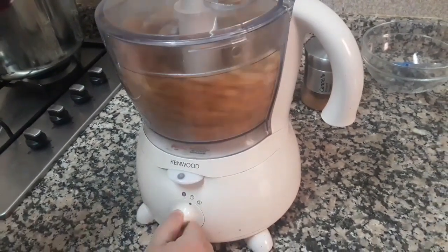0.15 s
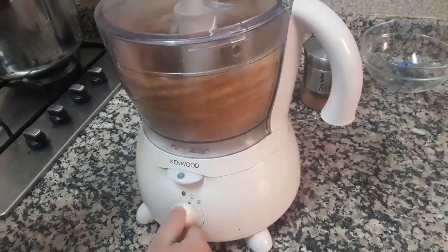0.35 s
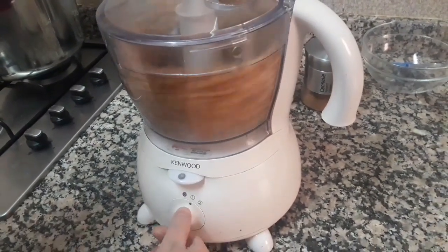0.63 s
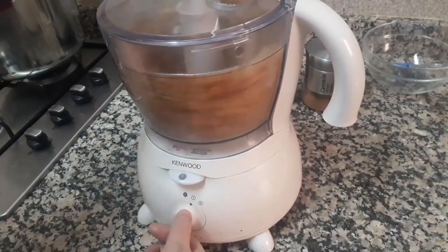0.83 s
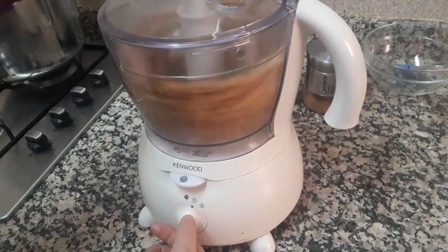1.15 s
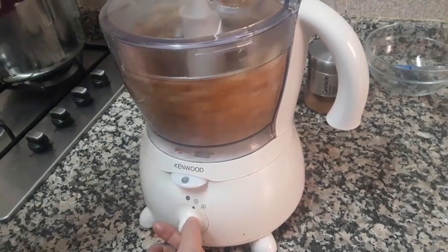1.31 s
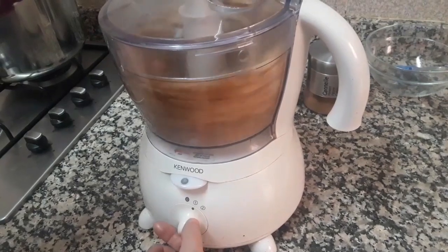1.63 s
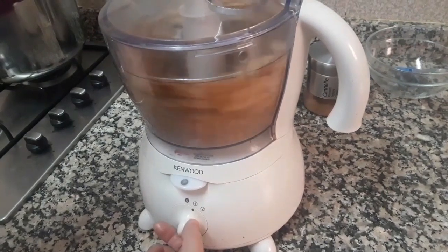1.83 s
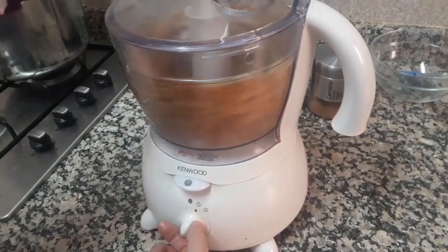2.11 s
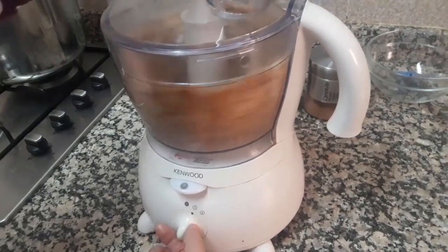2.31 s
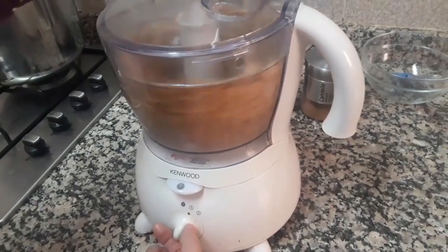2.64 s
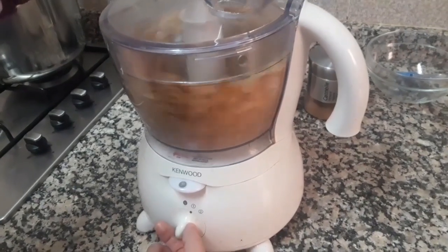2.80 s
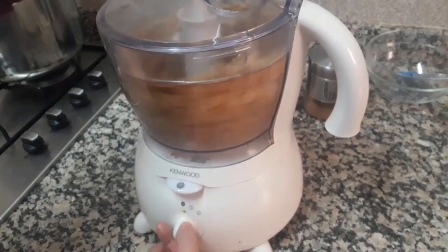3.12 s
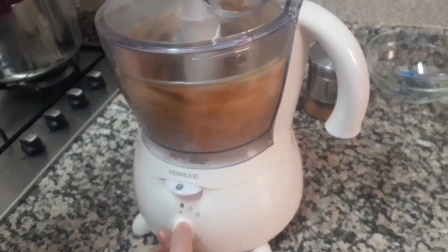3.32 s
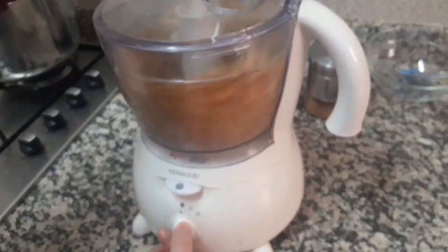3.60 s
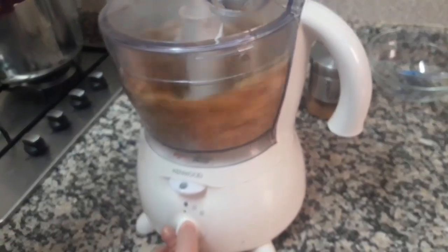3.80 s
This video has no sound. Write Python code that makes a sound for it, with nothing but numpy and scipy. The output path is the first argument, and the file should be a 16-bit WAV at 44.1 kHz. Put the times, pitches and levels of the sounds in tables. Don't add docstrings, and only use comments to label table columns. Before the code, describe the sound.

A small food processor churns hard nuts in its plastic bowl, a dense loud clatter with sharp cracks over low motor noise; a faint whine joins, then it runs down. Close phone microphone, small hard-walled kitchen.

```python
import sys
import numpy as np
from scipy import signal
from scipy.fft import rfft, irfft
from scipy.io import wavfile
from scipy.ndimage import uniform_filter1d

SR = 44100
rng = np.random.default_rng(int(sys.argv[2]) if len(sys.argv) > 2 else 0)


def wav_record(signal):
    frames = np.transpose(np.atleast_2d(signal))
    bounded = np.clip(frames, -1, 1)
    quanta = np.round(bounded * 32767).astype(np.int16)
    wavfile.write(sys.argv[1], SR, quanta)


def elevation(decibels):
    levels = np.asarray(decibels, float)
    return 10 ** (levels / 20)


N = 174195

# time_s, level_db
EFFORT = [(0, -11), (.2, -11), (.4, -13.5), (.7, -13), (1.5, -13), (2.15, -12.5), (2.3, -13), (2.5, -13.5),
          (2.9, -13.5), (3.1, -13.5), (3.4, -14.5), (3.5, -16.5), (3.63, -18.5), (3.7, -21), (3.83, -25),
          (3.9, -32.5), (3.95, -44)]
# time_s, peak_db
CRACKS = [(0.0667, -18), (0.1514, -18), (0.2284, -18), (0.2694, -18), (0.3124, -19), (0.38, -17),
          (0.5741, -19), (0.6913, -17), (0.8131, -17), (0.8495, -18), (0.9294, -20), (1.1194, -16),
          (1.1787, -19), (1.2925, -18), (1.3784, -19), (1.7873, -19), (1.8602, -19), (1.9425, -19),
          (2.2528, -19), (2.2852, -17), (2.3334, -17), (2.5995, -19), (2.8574, -19), (2.9282, -18),
          (3.1757, -18), (3.4124, -20), (3.5543, -22), (3.6202, -20), (3.6571, -24), (3.8322, -30)]
# frequency_hz, density_db_per_hz
STRIKE_SPECTRUM = [(500, -29.5), (1300, -15), (2600, -8.5), (4200, -13.5), (4900, -15.5), (7300, -17.5),
                   (8800, -28), (15500, -31.5)]
# frequency_hz, width_hz, lift_db
WALL_MODES = [(835, 270, 10), (950, 34, 4), (1175, 120, 5), (1083, 25, -1), (1290, 52, -2),
              (1780, 180, 5.5), (1926, 33, 10.5), (2267, 87, 8), (2393, 450, 2.5), (2920, 85, 11),
              (3390, 324, 14), (3990, 350, 10.5), (11400, 560, 1.5), (15200, 850, -4.5)]
# frequency_hz, density_db_per_hz
RUMBLE_SPECTRUM = [(12, -40), (20, -8), (54, -11), (112, -2), (145, -5), (270, 0), (475, -3), (552, -6.5),
                   (700, -8.5), (910, -22), (1540, -120)]
# time_s, level_db
STRAIN = [
    (0, -50),
    (.25, -56),
    (.4, -38),
    (.8, -34),
    (1., -47),
    (2.9, -46),
    (3.15, -37),
    (3.4, -33.5),
    (3.75, -40),
    (3.95, -51),
]
# frequency_hz, width_hz, level_db
BASE_MODES = [(235, 30, -4), (268, 30, 0), (305, 40, -2), (845, 30, -6), (1165, 30, -2)]
# time_s, pitch_hz, level_db
WHINE = [
    (.62, 1048, -52),
    (.75, 1055, -38),
    (.95, 1073, -34),
    (1.35, 1080, -36),
    (1.7, 1085, -36),
    (2.25, 1082, -34),
    (2.38, 1088, -39),
    (3.15, 1085, -40),
    (3.3, 1085, -55),
]

STRIKES_PER_S, SIZE_SPREAD_DB, BIGGEST_SHARE = 4000, 1.5, .015
TILT_SPREAD_DB, RING_SPREAD_DB = 1.43, 4
CLUMP_DB, CLUMP_HZ, CLUMP_SLOPE = 1.6, 110., -.1
THINNING = .25
CRUMBS_DB, CRUMBS_CLUMP = -4., 0.82
CRACK_DB, CRACK_BRIGHT_DB, CRACK_LAG_S = 24., .3, .001
HOUSING_SHARE = 0.67
MID_HZ, TOP_HZ, DEEP_HZ = 1850, 5000, 130
MID_FOLLOWS, FIZZ_FOLLOWS, TOP_FOLLOWS = 0.27, 1, 0.96
DEEP_FOLLOWS, MOTOR_FOLLOWS = .7, .4
RUMBLE_DB, RUMBLE_PATCH_DB = -34, 1.5
WHINE_WAVER_DB, WHINE_WAVER_HZ = 2.2, 2.
WET_DB, ROOM_T60_S, ROOM_TOP_HZ = -4, 0.2, 7560


def read(points, hz):
    f, value = np.transpose(points)
    return np.interp(np.log(hz + 1), np.log(f + 1), value)


def evened(x):
    return x / np.sqrt(np.mean(x ** 2) + 1e-20)


def below(x, edge_hz):
    hz = np.fft.rfftfreq(N, 1 / SR)
    return irfft(rfft(x) / (1 + (hz / edge_hz) ** 4), N)


def drift(top_hz, slope):
    hz = np.fft.rfftfreq(N, 1 / SR)
    shape = (hz > 3) * (hz + 1) ** -slope / (1 + (hz / top_hz) ** 2)
    return evened(irfft(rfft(rng.standard_normal(N)) * shape, N))


def causal(db):
    cepstrum = irfft(np.maximum(db, -100) * np.log(10) / 20)
    half = len(cepstrum) // 2
    cepstrum[1:half] *= 2
    cepstrum[half + 1:] = 0
    return irfft(np.exp(rfft(cepstrum)))[:2048]


def effort(share):
    time_s, level_db = np.transpose(EFFORT)
    return elevation(share * (np.interp(np.arange(N) / SR, time_s, level_db) - np.median(level_db)))


def strike(tilt_db, ring_db):
    hz = np.fft.rfftfreq(4096, 1 / SR)
    f, width, lift_db = np.transpose(WALL_MODES)[:, :, None]
    modes = elevation(lift_db + ring_db[:, None]) ** 2 / (1 + (2 * (hz - f) / width) ** 2)
    bass_loss_db = -12 * np.log2(np.maximum(STRIKE_SPECTRUM[0][0] / (hz + 1), 1))
    spectrum_db = read(STRIKE_SPECTRUM, hz) + bass_loss_db + 10 * np.log10(1 + modes.sum(0))
    return causal(spectrum_db + tilt_db * np.log2((hz + 500) / 3500))


def kitchen(x, ring):
    taps = np.zeros(SR // 4)
    at = np.arange(60, SR // 4 - 20, 20)
    taps[at + rng.integers(0, 20, len(at))] = rng.choice([-1., 1.], len(at))
    taps *= elevation(-60 * np.arange(len(taps)) / SR / ROOM_T60_S)
    lowpass = signal.butter(1, ROOM_TOP_HZ, fs=SR)
    taps = elevation(WET_DB) * signal.lfilter(*lowpass, taps / np.linalg.norm(taps))
    taps[0] = 1
    lead = SR // 8
    run = np.concatenate([x[lead:0:-1], x])
    return signal.fftconvolve(run, signal.fftconvolve(taps, ring))[lead:][:N]


def impacts():
    clump = elevation(CLUMP_DB * drift(CLUMP_HZ, CLUMP_SLOPE))
    chance, size, sign = rng.random((3, N))
    hit = chance < STRIKES_PER_S * clump * effort(THINNING) / SR
    strength = elevation(-SIZE_SPREAD_DB * np.log(np.maximum(size, BIGGEST_SHARE))) * np.sign(sign - .5)
    train = hit / effort(THINNING / 2) * strength
    crumbs = elevation(CRUMBS_DB) * clump ** CRUMBS_CLUMP * rng.standard_normal(N)
    return evened(train * clump) + crumbs


def cracks():
    pulses = np.zeros(N)
    time_s, peak_db = np.transpose(CRACKS)
    at = np.round((time_s + CRACK_LAG_S) * SR).astype(int)
    undo = effort(1)[np.round(time_s * SR).astype(int)]
    pulses[at] = elevation(peak_db - np.median(peak_db) + CRACK_DB) / undo
    return kitchen(pulses, strike(CRACK_BRIGHT_DB, np.zeros(len(WALL_MODES))))


def housing_buzz():
    noise = rng.standard_normal(N + 2048)
    ring = strike(0, np.zeros(len(WALL_MODES)))
    return evened(signal.fftconvolve(noise, ring)[2048:N + 2048])


def nuts(count=16):
    train = impacts()
    kind = rng.integers(0, count, N)
    colour = rng.standard_normal((count, 1 + len(WALL_MODES)))
    colour -= colour.mean(0)
    out = np.zeros(N)
    for k in range(count):
        ring = strike(TILT_SPREAD_DB * colour[k, 0], RING_SPREAD_DB * colour[k, 1:])
        out += kitchen(train * (kind == k), ring)
    out = evened(out + cracks())
    mid = below(out, MID_HZ)
    top = out - below(out, TOP_HZ)
    fizz = out - mid - top
    buzz = below(housing_buzz(), MID_HZ)
    low = np.sqrt(HOUSING_SHARE) * buzz + np.sqrt(1 - HOUSING_SHARE) * mid
    out = low * effort(MID_FOLLOWS) + fizz * effort(FIZZ_FOLLOWS) + top * effort(TOP_FOLLOWS)
    return out * elevation(np.median(np.transpose(EFFORT)[1]))


def rumble():
    frames, hz = N // 512 + 5, np.fft.rfftfreq(2048, 1 / SR)
    real, imag, patches = rng.standard_normal((frames, 1025, 3)).T
    patches = uniform_filter1d(patches, size=4, axis=0)
    patches = evened(uniform_filter1d(patches, size=12, axis=1))
    treble_loss_db = -18 * np.log2(np.maximum(hz / RUMBLE_SPECTRUM[-2][0], 1))
    level_db = read(RUMBLE_SPECTRUM[:-1], hz) + treble_loss_db
    z = (real + 1j * imag) * elevation(level_db[:, None] + RUMBLE_PATCH_DB * patches)
    hum = evened(signal.istft(z, nperseg=2048, noverlap=1536)[1][:N])
    deep = below(hum, DEEP_HZ)
    return elevation(RUMBLE_DB) * (deep * effort(DEEP_FOLLOWS) + (hum - deep) * effort(MOTOR_FOLLOWS))


def groan():
    hz = np.fft.rfftfreq(N, 1 / SR)
    f, width, level_db = np.transpose(BASE_MODES)[:, :, None]
    modes = np.sqrt((elevation(level_db) ** 2 / (1 + (2 * (hz - f) / width) ** 4)).sum(0))
    ringing = evened(irfft(rfft(rng.standard_normal(N)) * modes, N))
    time_s, strain_db = np.transpose(STRAIN)
    return elevation(np.interp(np.arange(N) / SR, time_s, strain_db)) * ringing


def whine():
    t = np.arange(N) / SR
    time_s, pitch_hz, level_db = np.transpose(WHINE)
    pitch = np.interp(t, time_s, pitch_hz) + WHINE_WAVER_HZ * drift(8.0, 0.63)
    level = np.interp(t, time_s, level_db, left=-90, right=-90) + WHINE_WAVER_DB * drift(15.0, 0.24)
    return np.sqrt(2) * elevation(level) * np.sin(2 * np.pi * np.cumsum(pitch) / SR)


def scene():
    return (nuts() + rumble() + groan() + whine())[None]


def top_cut(x):
    return signal.sosfilt(signal.butter(12, 15890, fs=SR, output="sos"), x)


def record(dry):
    held = dry / (1 + abs(dry / .97) ** 6) ** (1 / 6)
    return top_cut(held)


dry = scene()
out = record(dry)
wav_record(out)
```